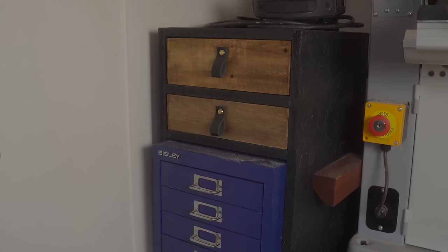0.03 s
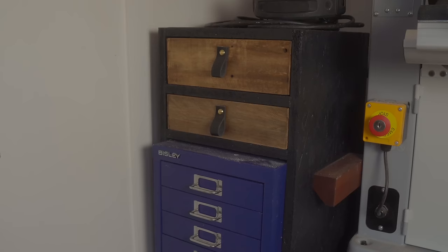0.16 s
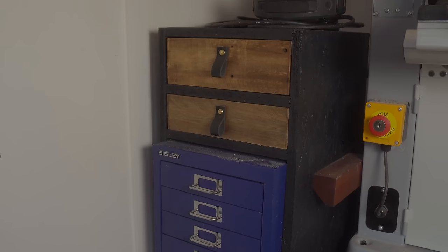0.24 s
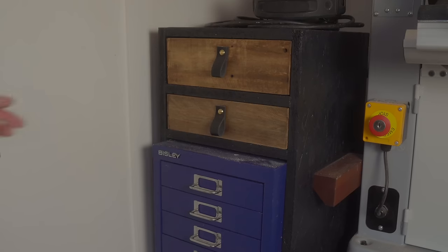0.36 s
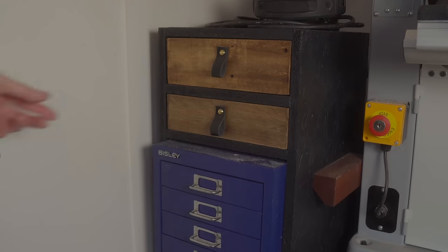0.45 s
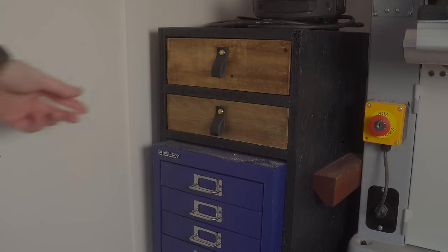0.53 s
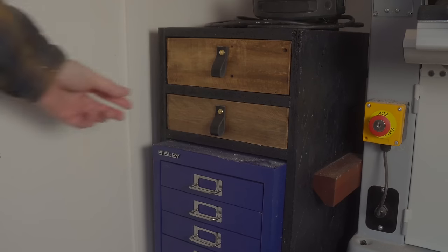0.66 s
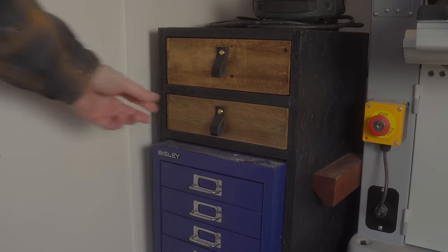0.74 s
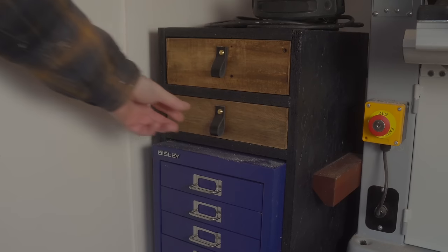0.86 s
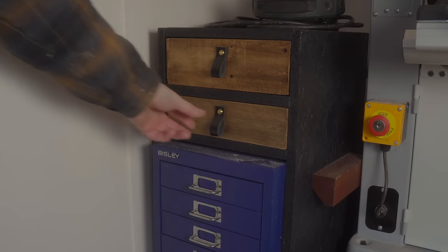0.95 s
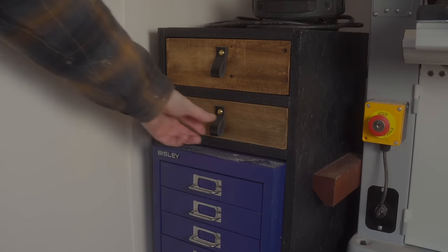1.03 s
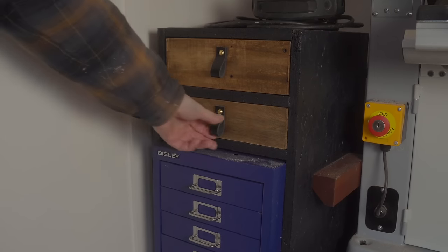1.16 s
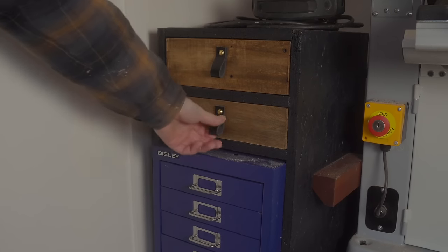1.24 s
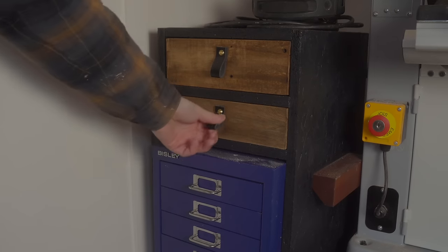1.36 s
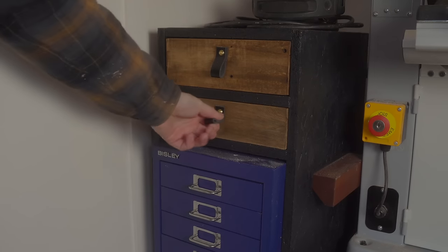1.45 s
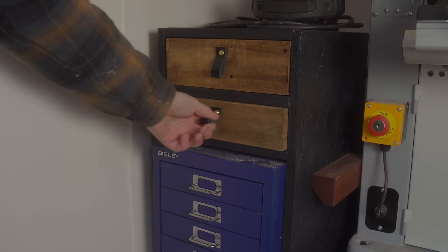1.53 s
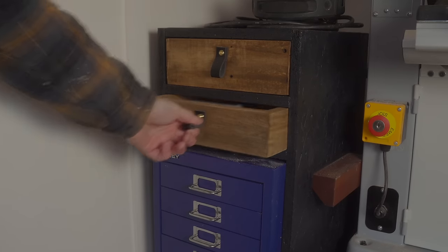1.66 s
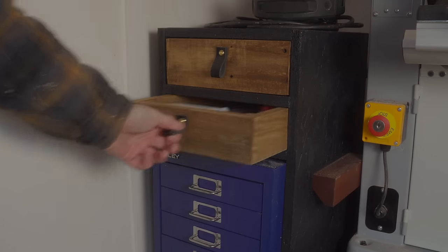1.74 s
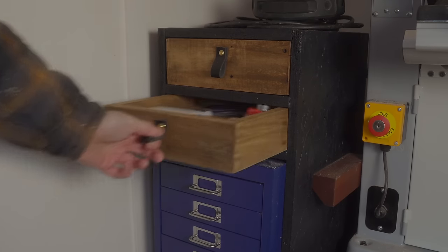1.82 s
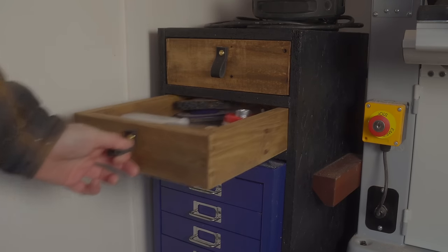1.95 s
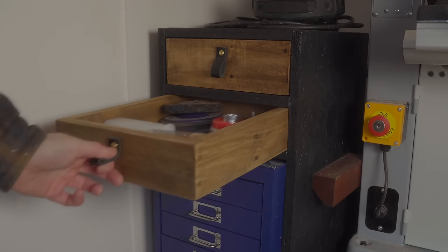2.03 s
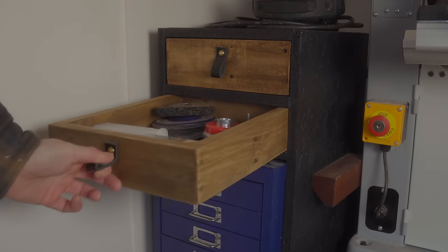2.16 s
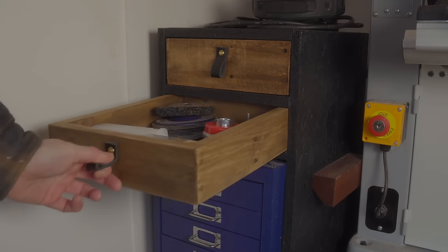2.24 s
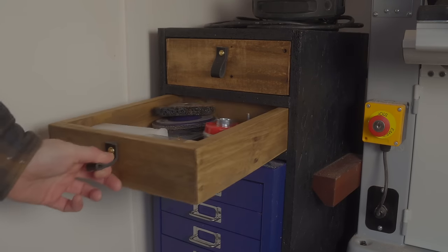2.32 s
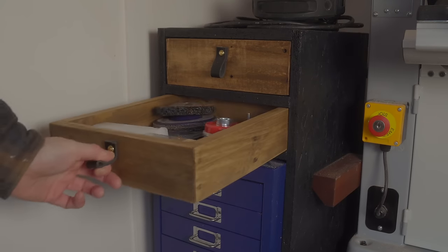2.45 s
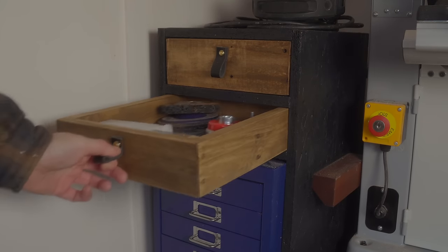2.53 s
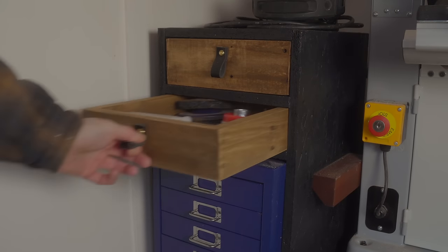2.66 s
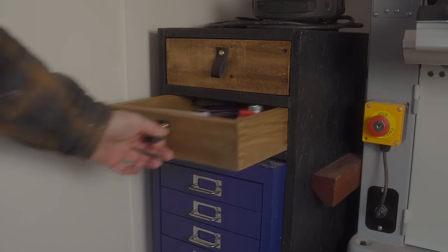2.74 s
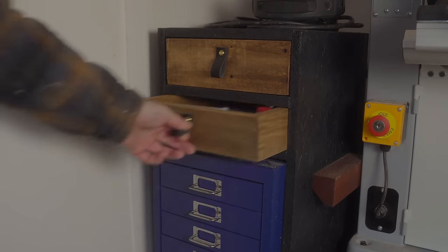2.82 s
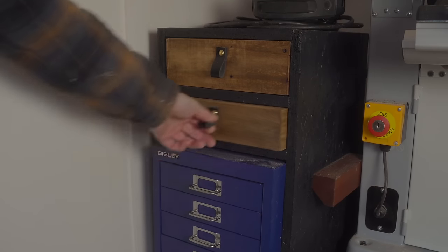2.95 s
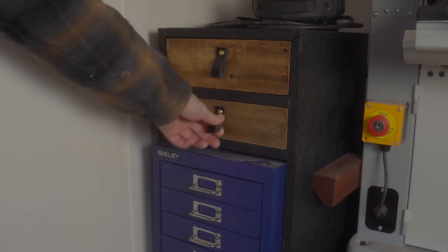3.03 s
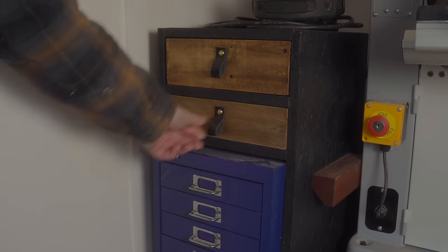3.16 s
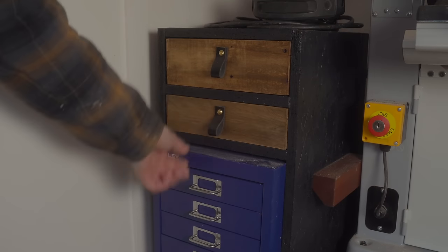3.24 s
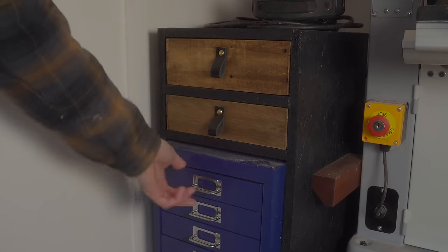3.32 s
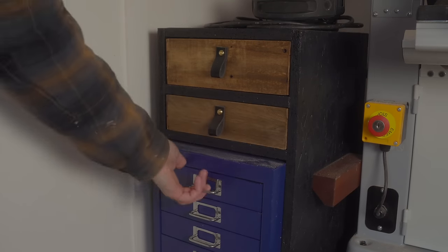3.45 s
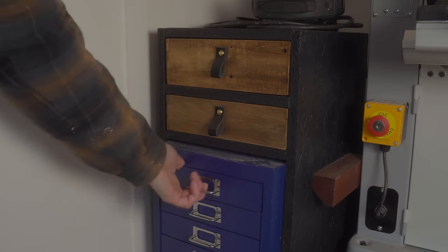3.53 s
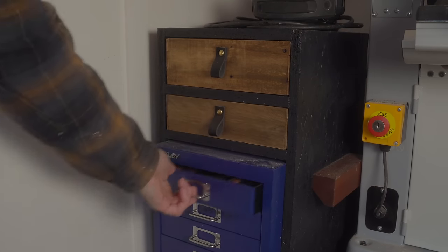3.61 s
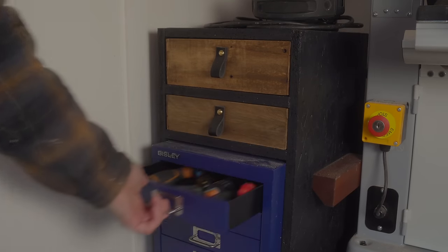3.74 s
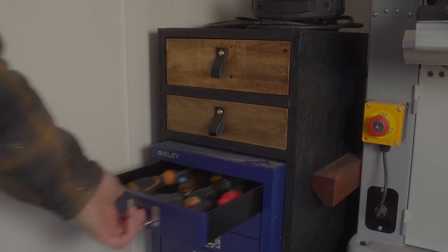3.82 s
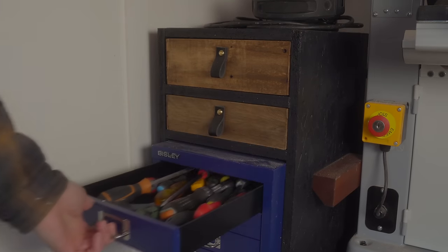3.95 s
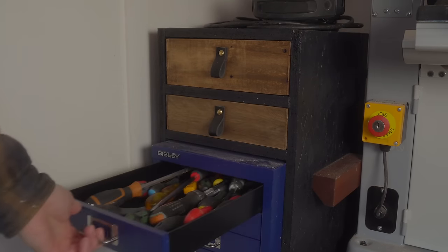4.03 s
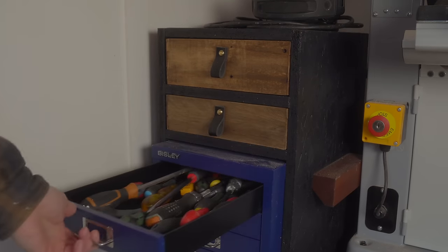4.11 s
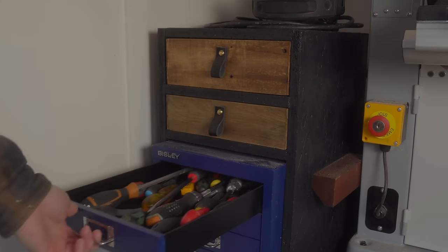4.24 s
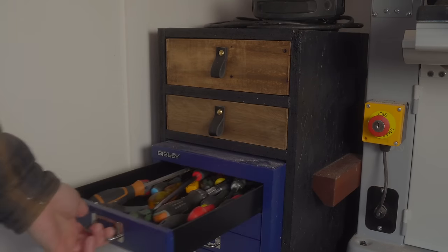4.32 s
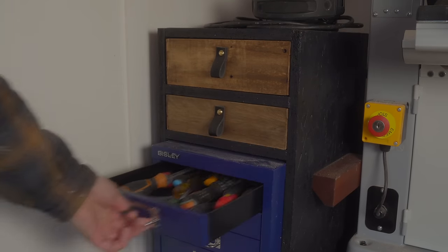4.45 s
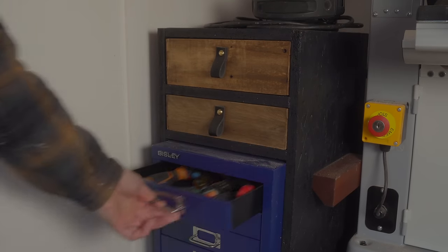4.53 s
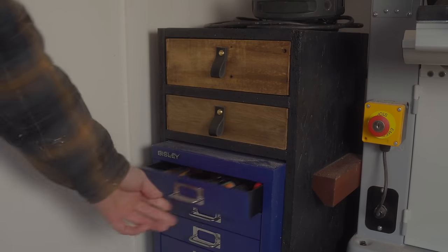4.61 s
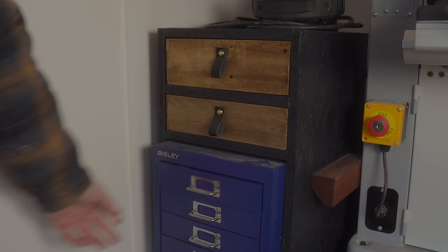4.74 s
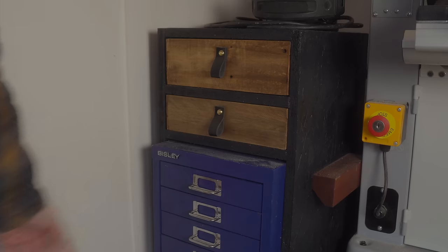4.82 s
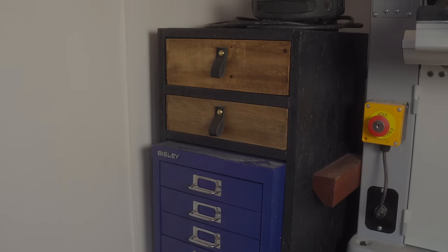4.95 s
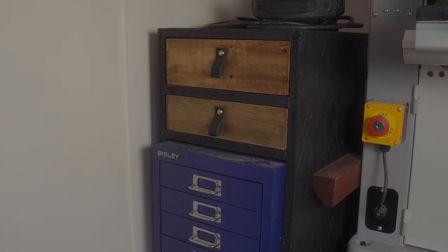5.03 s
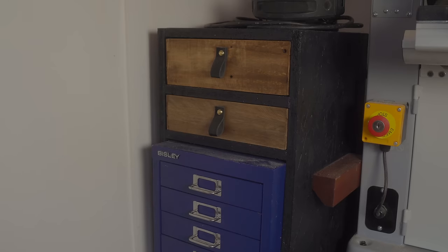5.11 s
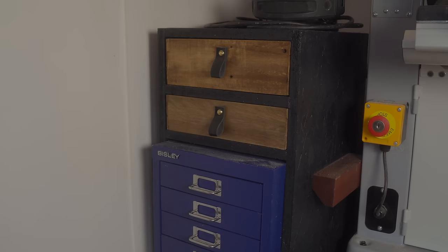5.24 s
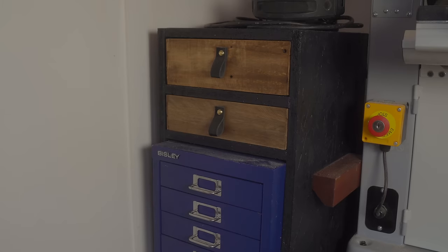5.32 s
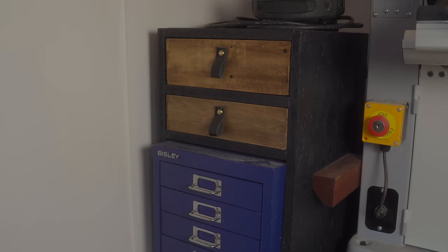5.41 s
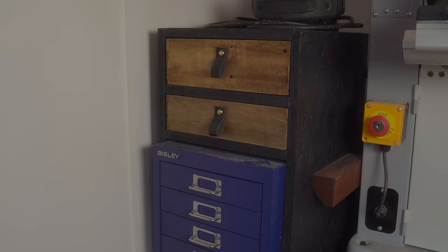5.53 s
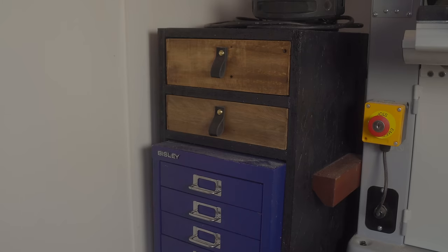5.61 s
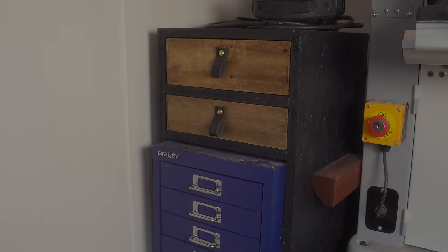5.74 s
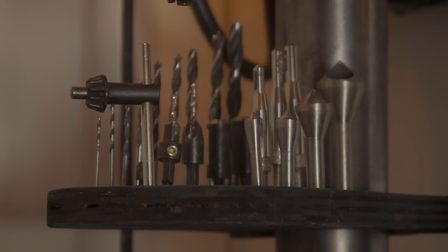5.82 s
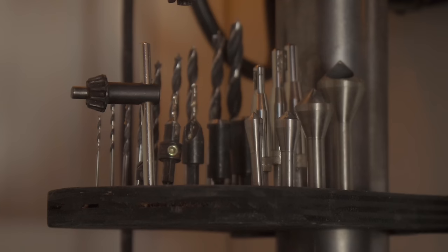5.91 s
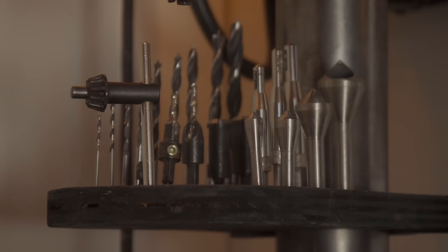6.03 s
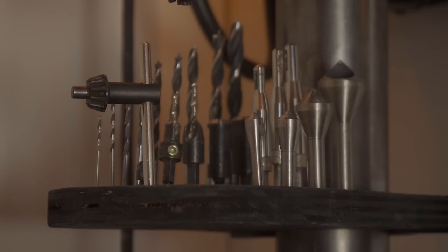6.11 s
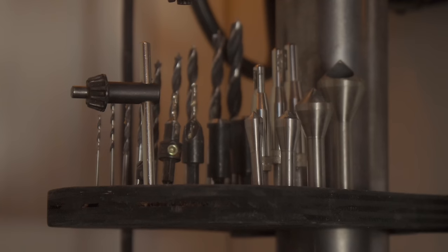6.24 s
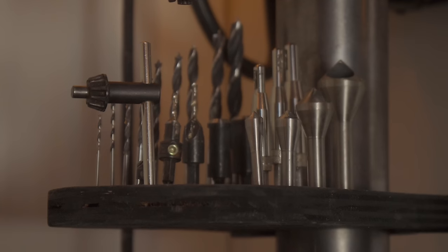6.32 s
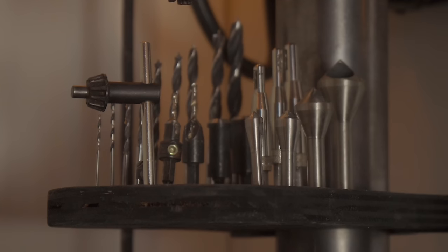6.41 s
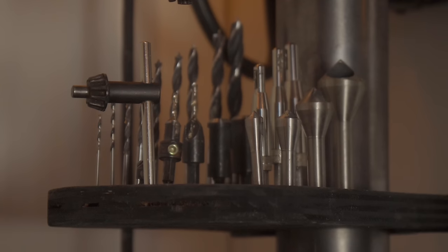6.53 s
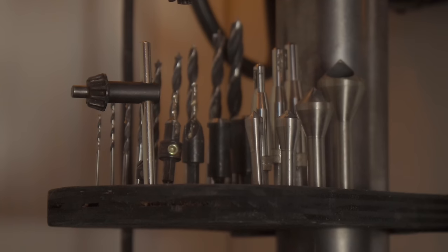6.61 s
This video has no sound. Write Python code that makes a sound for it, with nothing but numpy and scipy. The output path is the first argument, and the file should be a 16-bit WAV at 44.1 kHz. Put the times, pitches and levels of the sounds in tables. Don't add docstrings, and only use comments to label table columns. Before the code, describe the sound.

After light cloth movement and a dull step, a hand takes a drawer handle. The wooden box groans and stutters along its runners, loose tools knock inside, and it is shoved back with a heavy bang, the loudest event. Next a sheet-metal drawer hisses out, jolts sharply and slides closed with a small clank. Dry, close mono sound with a short room tail; a shuffle, then very quiet air.

```python
import sys
import numpy as np
from scipy import signal
from scipy.fft import rfft, irfft, next_fast_len
from scipy.io import wavfile
from scipy.ndimage import uniform_filter1d, minimum_filter1d

SR = 44100
rng = np.random.default_rng(int(sys.argv[2]) if len(sys.argv) > 2 else 0)


def dump(signal):
    limited = np.clip(np.atleast_2d(signal).T, -1, 1)
    pcm = np.round(limited * 32767).astype(np.int16)
    wavfile.write(sys.argv[1], SR, pcm)


def gain_from_db(level_db):
    decades = np.asarray(level_db, float) / 20
    return 10 ** decades


N = 294147
SCENE_CHANGE_S = 5.862


def rms_one(x):
    return x / np.sqrt(np.mean(x ** 2) + 1e-20)


def at_hz(points, hz):
    table_hz, values = np.array(points).T
    return np.interp(np.log(hz + 1), np.log(table_hz), values)


def coloured(x, spectrum):
    size = next_fast_len(N)
    response = gain_from_db(at_hz(spectrum, np.fft.rfftfreq(size, 1 / SR)))
    return rms_one(irfft(rfft(x, size) * response, size)[:N])


def drift(rate_hz):
    r = np.exp(-32 * np.pi * rate_hz / SR)
    warm_up = 3000
    noise = rng.standard_normal(N // 16 + warm_up + 1)
    slow = signal.lfilter([1], [1, -2 * r, r * r], noise)[warm_up:]
    return np.interp(np.arange(N) / 16, np.arange(len(slow)), rms_one(slow))


def grit(per_s, spread_db, judder_db, judder_hz):
    sizes = gain_from_db(spread_db * np.minimum(rng.exponential(1, N), 4.0)) * rng.choice([-1, 1], N)
    catches = rng.random(N) < per_s / SR
    return rms_one(sizes * catches * gain_from_db(judder_db * drift(judder_hz)))


def body(force, modes):
    out, power = 0, 0
    for k, (hz, width_hz, level_db) in enumerate(modes):
        r = np.exp(-np.pi * width_hz / SR)
        b = (1 - r * r) / 2 * gain_from_db(level_db) * (-1) ** k
        poles = [1, -2 * r * np.cos(2 * np.pi * hz / SR), r * r]
        out = out + signal.lfilter([b, 0, -b], poles, force + 1e-18)
        power += gain_from_db(2 * level_db) * np.pi * width_hz / SR
    return out / np.sqrt(power)


def wandering(modes, force, wander_db):
    power = sum(gain_from_db(2 * level_db) * width_hz for _, width_hz, level_db in modes)
    out = 0
    for k, (hz, width_hz, level_db) in enumerate(modes):
        mode = body(force * gain_from_db(wander_db * drift(14.0)), [(hz, width_hz, 0)])
        out = out + mode * gain_from_db(level_db) * np.sqrt(width_hz / power) * (-1) ** k
    return out


def dull(x, cut_hz):
    return signal.sosfilt(signal.butter(2, cut_hz, fs=SR, output="sos"), x)


def puff(t60):
    t = np.arange(SR // 5) / SR
    force = rng.standard_normal(len(t)) * gain_from_db(-60 * t / t60)
    force[0] += 12.0
    return force


def add(track, s, sound, peak_db):
    at = round(s * SR)
    track[at:at + len(sound)] += (gain_from_db(peak_db) / np.abs(sound).max() * sound)[:N - at]


def room_tone():
    # pitch_hz, density_db
    floor_spectrum = [(12, -40.5), (20, -16.5), (38, -4.5), (107, -12.5), (134, 0), (177, -13.5), (216, -7),
                      (285, -10), (527, -14.5), (825, -13.5), (976, -18), (1860, -23), (16000, -28)]
    t = np.arange(N) / SR
    level_db = -66 + 3 * (t < SCENE_CHANGE_S)
    return gain_from_db(level_db) * coloured(grit(27000, 1.5, 0.71, 8.0), floor_spectrum)


def person():
    # start_s, length_s, shuffle_db,
    # rustle_db, sag_db_per_s
    moves = [
        (0.0, 0.14, -55.5, -60.5, 13),
        (0.153, 0.094, -54.5, -61, 14),
        (0.298, 0.89, -62, -69.5, 6),
        (1.086, 0.0073, -74, -72, 7),
        (5.067, .79, -59, -72, 8.5),
        (5.399, 0.18, -91, -83.5, 4.5),
             (.65, .38, -58, -90, 5),
    ]
    # pitch_hz, density_db
    shuffle_spectrum = [(59, -15), (100, -4), (297, 0), (431, 3), (541, -2), (606, -2), (760, -9),
                        (1500, -15), (1950, -12), (3300, -120)]
    # pitch_hz, density_db
    cloth_spectrum = [(530, -19), (900, -4.5), (1040, -8.5), (1360, -7.5), (1990, -9), (2830, -9),
                      (13800, -18), (16000, -22.5)]
    attack_s, release_db_per_s = 0.011, 202
    t, shuffle, rustle = np.arange(N) / SR, 0, 0
    for s, length, shuffle_db, rustle_db, sag in moves:
        rise = np.clip((t - s) / attack_s + 1, 0, 1)
        release = gain_from_db(-release_db_per_s * np.maximum(t - s - length, 0))
        shape = rise * release * (t < SCENE_CHANGE_S)
        age = np.maximum(t - s, 0)
        shuffle = shuffle + shape * gain_from_db(shuffle_db - 2.0 * sag * age)
        rustle = rustle + shape * gain_from_db(rustle_db - 0.18 * sag * age)
    low = shuffle * coloured(grit(1500, 5.6, 0.99, 14), shuffle_spectrum)
    return low + gain_from_db(5.5) * rustle * coloured(grit(10000, 2.5, 0.86, 25), cloth_spectrum)


def steps():
    # start_s, peak_db, pitch_hz, t60_s
    footfalls = [
        (0.375, -47, 233, 0.26),
        (0.62, -33, 218, 0.25),
        (0.71, -42, 370, 0.095),
        (1.083, -43, 240, 0.41),
        (1.15, -40.5, 666, 0.08),
        (5.167, -38.5, 324, 0.17),
        (5.899, -52.5, 403, 0.15),
    ]
    out = np.zeros(N)
    for s, peak_db, hz, t60 in footfalls:
        modes = [(hz, .5 * hz, 0), (0.61 * hz, 0.1 * hz, -3), (1.86 * hz, 0.17 * hz, -10)]
        sound = body(puff(t60), modes)
        add(out, s, dull(dull(sound, 1120), 1600), peak_db - 2.5)
    return out


def boom():
    # start_s, peak_db, pitch_hz, t60_s, swell_s
    ringing_panels = [(3.072, -45, 100, .8, .04), (3.075, -24, 137, .2, 0.016),
                      (3.0722, -3, 486, 0.04, 0.00053), (4.878, -36, 250, 0.29, 0.0046),
                      (4.878, -39.5, 190, 0.34, 0.0102), (4.878, -34.5, 870, 0.1, 0.0023),
                      (4.88, -39, 610, 0.12, 0.0026), (4.878, -37, 280, 0.29, 0.0034),
                      (4.879, -43, 135, 0.36, 0.0029), (4.89, -57.5, 75, 0.35, 0.0204),
                      (.63, -49, 89.6, 0.24, 0.018)]
    out, t = np.zeros(N), np.arange(SR // 2) / SR
    for s, peak_db, hz, t60, swell in ringing_panels:
        add(out, s, np.sin(2 * np.pi * hz * t) * (1 - np.exp(-t / swell)) * gain_from_db(-60 * t / t60), peak_db)
    return out


def scrapes():
    # start_s, length_s, centre_hz, width_share (of centre), peak_db
    brushes = [(1.087, .004, 4200, .4, -52), (1.09, .006, 12500, .5, -51), (1.096, .003, 7000, .4, -51.5),
               (1.107, .004, 13000, .5, -50), (1.108, .008, 5000, .8, -57), (1.13, .002, 2600, .6, -58),
               (1.62, .003, 1500, .8, -39), (1.752, .002, 6500, .6, -46), (1.778, .004, 3000, .2, -36),
               (1.94, .008, 4200, .4, -38), (2.241, .003, 6000, .3, -30), (2.295, .035, 3430, .5, -31.5),
               (2.725, .035, 5000, .8, -42), (2.909, .003, 5500, .7, -32), (3.095, .003, 2200, .6, -22.5),
               (3.073, .002, 3995, 1.0, -25), (3.005, .05, 2200, .6, -34.5), (2.66, .006, 1400, 1.0, -23),
               (3.675, 0.067, 3752, .06, -42), (3.765, .03, 2720, .3, -37.5), (3.85, .09, 5200, .15, -37),
               (3.975, .07, 2500, .1, -33), (3.985, .03, 3600, .2, -34), (4.471, .004, 5600, .3, -23.5),
               (4.49, .055, 5500, .25, -27.5), (4.49, .04, 1054, 0.17, -26.5),
               (4.49, 0.044, 1800, .1, -30.5), (4.55, .006, 3500, .4, -30), (4.605, .008, 4500, .3, -31),
               (4.633, .004, 5390, .2, -35), (4.65, .012, 3700, .15, -33), (4.91, .04, 2200, .5, -35),
               (4.422, .02, 1500, .8, -22), (4.11, .05, 1500, .6, -44), (4.416, .012, 4320, .6, -17.5),
               (.62, .002, 470, .5, -36), (.64, .035, 320, 0.54, -38), (2.18, .004, 13000, .4, -27),
               (1.955, .01, 2500, .8, -29.5)]
    out, t = np.zeros(N), np.arange(SR // 6) / SR
    for s, length, hz, share, peak_db in brushes:
        force = rng.standard_normal(len(t)) * gain_from_db(3.0 * rng.exponential(1, len(t)).clip(0, 3))
        fall_s = .012 + 30.0 / hz
        force = force * gain_from_db(-60 * np.maximum(t - length, 0) / fall_s)
        mode = [(hz, share * hz, 0)]
        add(out, s, body(body(force, mode), mode), peak_db)
    return out


def tools():
    # start_s, peak_db, pitch_hz, t60_s
    tool_ticks = [(1.541, -40, 9500, .02), (1.643, -42, 14620, .02), (1.643, -42, 12000, .02),
                  (1.955, -40, 13480, .08), (1.956, -39.5, 7200, .032), (1.957, -34.5, 10500, .03),
                  (2.059, -50, 11300, .017), (2.18, -35, 12700, .022), (2.181, -36, 9840, .022),
                  (2.25, -61.5, 12200, .4), (2.856, -24, 13500, .015), (2.867, -31, 12800, .015),
                  (2.868, -34, 15600, .03), (2.868, -32, 7400, .015), (2.872, -15, 11050, .018),
                  (2.873, -29, 13900, .03), (2.874, -27, 9790, .03), (2.874, -26, 7490, .03),
                  (2.885, -36, 10800, .03), (2.889, -38, 15200, .06), (2.875, -32.5, 5700, .03),
                  (2.909, -36.5, 13190, .02), (2.909, -38, 8000, .02), (3, -49.5, 10000, .018),
                  (3.036, -45.5, 13500, .03), (3.037, -44, 9000, .03), (3.074, -32, 13800, .04),
                  (3.161, -23.5, 4606, .02), (3.161, -29, 3620, .02), (3.162, -27, 6300, .02),
                  (3.17, -62, 12200, .4), (3.488, -49, 10200, .05), (3.566, -39, 15800, .05),
                  (4.471, -30, 10690, .04)]
    # start_s, peak_db, pitch_hz, t60_s
    wall_knocks = [(1.15, -48, 1374, 0.094), (1.663, -28, 1356, 0.044), (1.697, -24, 1420, 0.036),
                   (1.803, -26.5, 3070, 0.046), (1.804, -38, 3500, .03), (2.1432, -17, 2550, 0.035),
                   (2.144, -16, 1870, 0.029), (2.145, -19, 955, 0.045), (2.181, -12, 884, 0.031),
                   (2.18, -16.5, 420, 0.057), (2.182, -27, 2640, 0.037), (2.242, -15, 2200, 0.031),
                   (2.248, -16, 3400, .018), (2.068, -34, 3040, 0.056), (2.247, -29, 3900, 0.034),
                   (2.283, -20, 1870, 0.034), (2.537, -40, 321.7, .08), (2.66, -25, 1810, .04),
                   (2.66, -20.5, 1196, 0.044), (2.661, -27, 720, .06), (2.857, -11, 359, 0.1),
                   (5.167, -50, 1210, 0.049), (5.19, -52, 540, .15), (5.27, -48, 270, 0.32),
                   (3.197, -29, 1230, .06), (4.414, -13, 1980, .025), (4.415, -16.5, 870, .04),
                   (4.417, -13.5, 594, .05), (2.248, -11.5, 1110, .03), (4.476, -27, 990, 0.045),
                   (4.587, -34, 880, 0.045), (4.686, -29, 696, 0.051), (4.725, -26, 965, 0.035),
                   (4.89, -25.5, 1910, 0.05), (4.891, -25, 2600, 0.052), (4.892, -26, 3290, 0.046)]
    out, t = np.zeros(N), np.arange(SR // 2) / SR
    for s, peak_db, hz, t60 in tool_ticks + wall_knocks:
        cluster = sum(np.sin(2 * np.pi * hz * (1 + offset) * t) for offset in [-.09, -.04, .035, .08])
        cluster = cluster * gain_from_db(-60 * t / min(t60, .022))
        ring = np.sin(2 * np.pi * hz * t) * gain_from_db(-60 * t / t60) + 0.37 * cluster
        build_up = np.minimum(t * max(hz, 2500) / 2.4, 1)
        add(out, s, ring * build_up, peak_db)
    return out


def control_curves(strokes):
    edge_s, t, out = .015, np.arange(N) / SR, 0
    for rows in strokes:
        s, *columns = np.transpose(rows)
        s = np.r_[s[0] - edge_s, s, s[-1] + edge_s]
        out = out + np.array([gain_from_db(np.interp(t, s, np.r_[-120, column, -120])) for column in columns])
    return out


def near_region(modes, struck_hz):
    return [(hz, width, db - 7.4 * abs(np.log2(hz / struck_hz))) for hz, width, db in modes]


def drawer(strokes, blows, low, high, hiss, boom_db, speed_share, rasp_db, clatter_s,
           rasp_per_s, judder_db, thud_db, clack_db, crack_db):
    # pitch_hz, width_hz, level_db
    cabinet = [(79, 19, -5.5), (143, 42, 4)]
    weight, speed = control_curves(strokes)
    out = dull(body(gain_from_db(boom_db) * weight * grit(470, 3.5, 3.7, 18), cabinet), 300)
    catching = grit(900, 3.0, judder_db, 35)
    out += dull(wandering(low, weight * catching, wander_db=4.0), 1200)
    rasp = gain_from_db(rasp_db) * weight ** (1 - speed_share) * speed ** speed_share
    rasp = rasp * grit(rasp_per_s, 3.5, 1.2 * judder_db, 45)
    out += dull(wandering(high, rasp, wander_db=3.0), 4200)
    out += speed * coloured(grit(9700, 4.3, 0.57 * judder_db, 30), hiss)

    bright = coloured(rng.standard_normal(N), hiss)
    age = np.arange(SR // 4) / SR
    for s, peak_db, clack_rel, crack_rel, struck_hz in blows:
        t60 = clatter_s * gain_from_db(-0.04 * max(clack_rel + 16, 0))
        thud = dull(body(puff(0.55 * t60), near_region(low, struck_hz)), 1200)
        add(out, s, thud, peak_db + thud_db)
        clack = dull(body(puff(1.1 * t60), near_region(high, struck_hz)), 5000)
        add(out, s, clack, peak_db + clack_rel + clack_db)
        cabinet_thump = dull(body(puff(0.23 * t60), cabinet), 390)
        add(out, s, cabinet_thump, peak_db + boom_db - 9.5 * np.log2(struck_hz / 200))
        fall = gain_from_db(-60 * age / (0.67 * t60)) + .3 * gain_from_db(-60 * age / (1.7 * t60))
        crack = fall * bright[round(s * SR):][:SR // 4]
        add(out, s, crack, peak_db + crack_rel + crack_db)
    return out


def slam(count):
    slam_s, peak_db, clack_db, crack_db, mode_hz = 3.072, -3.5, -23, -35, 463
    gap_s = 5 / mode_hz
    return [(slam_s + k * gap_s, peak_db - 0.3 * k * k, clack_db, crack_db, mode_hz) for k in range(count)]


def wooden_drawer():
    # start_s, weight_db (on the runners), speed_db (sliding)
    strokes = [
        [(1.53, -70.5, -65.5), (1.6, -44, -59), (1.714, -32, -53.5), (1.842, -28.5, -49.5), (2.04, -43, -51.5)],
        [(2.058, -35, -51), (2.208, -40, -48), (2.27, -49.5, -46), (2.398, -55.5, -79), (2.5, -57, -87.5)],
        [(2.52, -58, -71), (2.65, -41.5, -59), (2.735, -33, -49), (2.79, -38, -53.5), (2.842, -39.5, -48),
         (2.936, -27, -44), (2.988, -32, -53), (3.069, -27, -44.5)],
        [(3.07, -33, -45.5), (3.104, -33.5, -46), (3.15, -40, -47), (3.21, -45, -52), (3.25, -50, -58.5),
         (3.344, -47, -80), (3.48, -43, -78)],
    ]
    # start_s, thud_db,
    # clack_rel_db, crack_rel_db, struck_hz
    box_blows = [(1.541, -42.5, -5, 4.5, 650), (1.636, -15.5, -16, -21.5, 330), (1.66, -18, -8, -45, 470),
                 (1.697, -20, -5.5, -28.5, 463), (1.759, -16.5, -16.5, -27.5, 334.5),
                 (1.803, -19.5, -12.5, -14.5, 399), (1.811, -10, -19, -54, 323),
                 (1.848, -20.5, -22, -33.5, 657), (1.866, -14, -24.5, -31.5, 409),
                 (1.898, -19, -21.5, -33.5, 428), (1.92, -16, -17.5, -40, 409),
                 (1.957, -20, -10, -16, 410.3), (2.058, -17, -14.5, -32, 354),
                 (2.092, -23.5, -13.5, -22.5, 339), (2.144, -23.5, -6.5, -28, 2328),
                 (2.179, -20.5, -6.5, -6.5, 601), (2.241, -19, -2.5, -30.5, 2054),
                 (2.247, -11.5, 2, -22.5, 1050), (2.283, -17, -2, -32.5, 1688),
                 (2.66, -34, -4, -32, 1410), (2.842, -16.5, -21.5, -41, 350),
                  (2.76, -29.5, -16.5, -23.5, 339), (2.856, -15.5, -14, -34.5, 355),
                  (2.866, -11.5, -5, -15, 1020), (2.897, -11.5, -15, -33.5, 358),
                  (3.015, -21.5, -22, -34.5, 463), (3.16, -11, -5.5, -25, 290),
                  (3.18, -11, -14.5, -34, 472), (3.222, -24, -12, -35, 495), (3.199, -19, -4.5, -33, 457),
                  (3.378, -34.5, -12, -45, 681)]
    # pitch_hz, width_hz, level_db
    low_modes = [(186, 37, -11.5), (262.2, 15.7, -5), (283, 14, -5), (339.3, 24, 0), (403, 32, -3),
                 (463, 24, -3), (532.4, 22, -6.5), (660, 40, -6), (765, 52, -9), (895, 59, -10.5)]
    # pitch_hz, width_hz, level_db
    high_modes = [(1043, 100, -2), (1140, 82, 1.5), (1340, 220, -4), (1626, 80, -2), (1844, 180, -3),
                  (2200, 110, -2), (2600, 500, -7.5), (3150, 140, -9.5), (3406, 320, -10.5)]
    # pitch_hz, density_db
    hiss_spectrum = [(1470, -35), (2500, -7), (4760, -10.5), (7300, -10), (9290, -14.5), (10900, -16.5),
                     (11900, -19.5), (13900, -16.5), (16000, -26.5)]
    out = drawer(strokes, box_blows + slam(count=7), low_modes, high_modes, hiss_spectrum,
                 boom_db=-14.5, speed_share=0.31, rasp_db=-2, clatter_s=0.089,
                 rasp_per_s=1500.0, judder_db=2.0, thud_db=-0.5, clack_db=4.0, crack_db=5.5)
    seat_s, seat_takes_s, seat_loss_db = 3.147, .004, 9.5
    panels = signal.sosfiltfilt(signal.butter(2, 3000, fs=SR, output="sos"), out)
    seated = np.clip((np.arange(N) / SR - seat_s) / seat_takes_s, 0, 1)
    return out - panels * (1 - gain_from_db(-seat_loss_db * seated))


def singing():
    # start_s, length_s, pitch_hz, peak_db
    rubbed_modes = [(1.761, 0.084, 340, -20), (1.81, 0.04, 440, -22), (1.855, .025, 415, -19),
                    (1.905, .04, 385, -19), (1.655, .03, 460, -29), (1.845, 0.025, 680, -23.5),
                    (1.81, 0.043, 1150, -37), (1.897, .07, 664, -33), (1.98, 0.048, 440, -30.5),
                    (2.09, 0.16, 340, -28), (2.701, 0.069, 423, -35), (2.719, 0.1, 335, -32),
                    (2.71, .06, 85, -45.5), (2.25, 0.04, 270, -25), (2.875, 0.037, 1000, -24.5),
                    (1.81, .02, 351, -17.5), (2.89, 0.025, 400, -21), (3.0725, 0.072, 463, -10),
                    (3.072, .03, 850, -14), (3.095, 0.027, 800, -15.5), (3.0725, 0.019, 690, -13.5),
                    (3.077, 0.032, 1600, -26), (3.125, 0.022, 400, -9), (3.29, .07, 530, -47),
                    (3.017, .002, 470, -20.5), (2.856, 0.0087, 320, -12), (3.102, 0.069, 250, -22),
                    (3.15, 0.019, 1180, -25.5), (3.16, 0.023, 780, -28.5), (3.21, 0.018, 476, -30),
                    (3.63, 0.065, 505, -38), (3.65, 0.039, 840, -40), (4.099, 0.032, 620, -36.5),
                    (4.439, 0.046, 619, -28.5), (4.41, 0.088, 344, -25), (4.545, 0.05, 345, -32.5),
                    (4.61, 0.042, 460, -39), (4.92, 0.03, 240, -41)]
    rise_s, fall_db_per_s = 0.0028, 900.5
    out, t = np.zeros(N), np.arange(SR // 2) / SR
    for s, length, hz, peak_db in rubbed_modes:
        shape = (1 - np.exp(-t / rise_s)) * gain_from_db(-fall_db_per_s * np.maximum(t - length, 0))
        twin = .45 * np.sin(2 * np.pi * hz * 1.06 * t)
        add(out, s, shape * (np.sin(2 * np.pi * hz * t) + twin), peak_db)
    return out


def steel_drawer():
    # start_s, weight_db (on the runners), speed_db (sliding)
    strokes = [
        [(3.46, -62, -61), (3.558, -51.5, -62.5), (3.568, -39, -40), (3.6, -43, -50), (3.645, -35, -54),
         (3.75, -41.5, -47), (3.78, -40.5, -42.5), (3.872, -36.5, -38.5), (4.014, -46, -38), (4.126, -40, -52),
         (4.24, -78, -79)],
        [(4.34, -64, -77), (4.405, -46, -53)],
        [(4.42, -20, -23), (4.456, -34, -43.5), (4.47, -35, -29.5), (4.56, -37, -36.5), (4.706, -40.5, -41),
         (4.865, -48.5, -60.5)],
        [(4.875, -29.5, -34), (4.889, -30, -35), (4.975, -49.5, -55.5), (5.061, -62, -77)],
    ]
    # start_s, thud_db, clack_rel_db, crack_rel_db, struck_hz
    blows = [(3.486, -36, -8, -14.5, 283), (3.528, -37.5, -20, -18, 328.6), (3.565, -28, -23, -4.5, 657),
             (3.664, -28, -8, -22, 563), (4.098, -30, -6, -20.5, 582), (4.413, -9.5, 10.5, -12, 2030),
             (4.47, -16.5, -15, -8, 596), (4.683, -30, -16, -6, 727), (4.726, -27.5, -3, -26, 949),
             (4.876, -28.5, 7.5, -13.5, 270), (4.89, -29, -9, -13, 250), (4.94, -36, -4, -22, 1000),
             (4.586, -33.5, -28, -6.5, 900)]
    # pitch_hz, width_hz, level_db
    low_modes = [(218, 76, -8.5), (270, 56, -4.5), (345, 35, 1), (464, 50, 0), (618, 54, -0.5),
                 (720, 69, -5.5), (870, 68, -2.5)]
    # pitch_hz, width_hz, level_db
    high_modes = [(988, 54, 0.5), (1296, 200, -3.5), (1570, 120, -2), (1785, 130, -3.5), (2022, 150, -3),
                  (2330, 270, -5), (3050, 302, -6), (3770, 490, -7)]
    # pitch_hz, density_db
    hiss_spectrum = [(1470, -35.5), (2500, -15), (2640, -6), (3080, -5.5), (4480, -6.5), (5920, -6),
                     (10500, -13), (12200, -15.5), (14000, -12), (16000, -23)]
    return drawer(strokes, blows, low_modes, high_modes, hiss_spectrum,
                  boom_db=-26, speed_share=0.95, rasp_db=1.44, clatter_s=0.0806,
                  rasp_per_s=4000.0, judder_db=0.7, thud_db=-1.5, clack_db=-7.0, crack_db=3.0)


def workshop(x):
    # pitch_hz, t60_s
    room_decay = [(150, 0.34), (1000, 0.24), (4000, 0.29), (12000, 0.24)]
    t, tail = np.arange(SR // 2) / SR, 0
    for hz in 62.5 * 2 ** np.arange(8.):
        top_hz = hz * np.sqrt(2) * (1.4 if hz > 7000 else 1)
        band = signal.butter(2, [hz / np.sqrt(2), top_hz], "band", fs=SR, output="sos")
        noise = signal.sosfilt(band, rng.standard_normal(len(t)))
        tail = tail + noise * gain_from_db(-60 * t / at_hz(room_decay, hz))
    tail = tail * np.clip(t / 0.0035 - .5, 0, 1)
    return signal.fftconvolve(x, tail / np.sqrt(np.sum(tail ** 2)))[:N]


def scene():
    near = person() + steps() + boom() + scrapes() + tools()
    near = near + wooden_drawer() + singing() + steel_drawer()
    near = signal.sosfilt(signal.butter(2, 55, "high", fs=SR, output="sos"), near)
    mix = near + gain_from_db(-9) * workshop(near) + room_tone()
    t = np.arange(N) / SR
    fade_in = np.clip((t - SCENE_CHANGE_S) / 0.023, 0, 1)
    return (mix * np.where(t < SCENE_CHANGE_S, 1, fade_in))[None]


def low_pass(x):
    return signal.sosfilt(signal.butter(12, 15800, fs=SR, output="sos"), x)


def record(dry):
    ceiling, window = .87, 200
    allowed = np.minimum(1, ceiling / (np.abs(dry[0]) + 1e-9))
    gain = uniform_filter1d(minimum_filter1d(allowed, size=window), size=window)
    top = signal.cheby2(10, 40, 16700, fs=SR, output="sos")
    return low_pass(signal.sosfilt(top, dry * gain))


dry = scene()
out = record(dry)
dump(out)
```